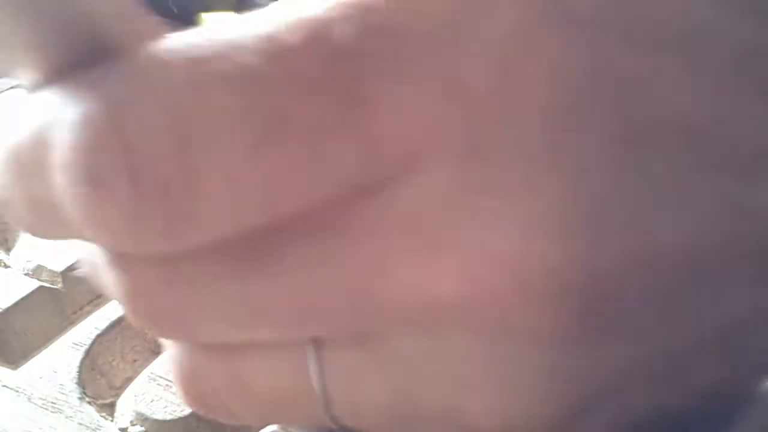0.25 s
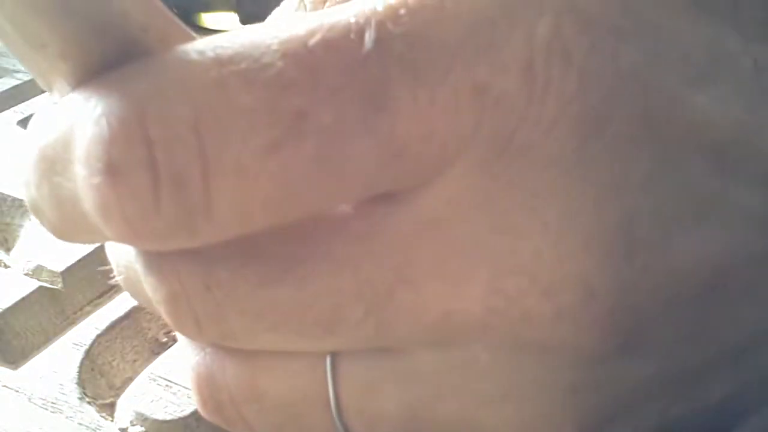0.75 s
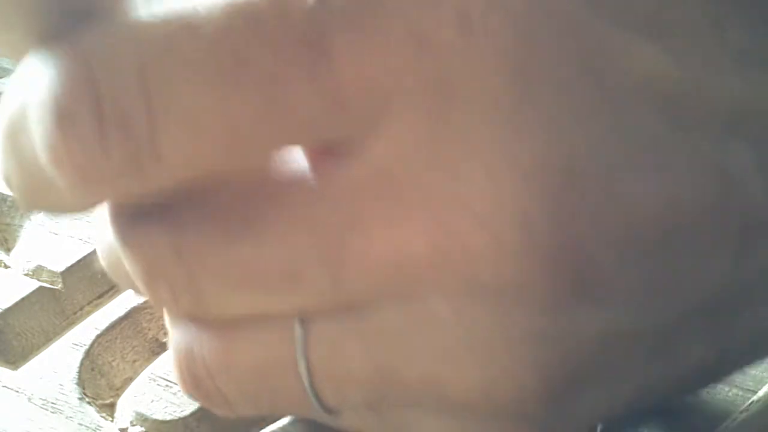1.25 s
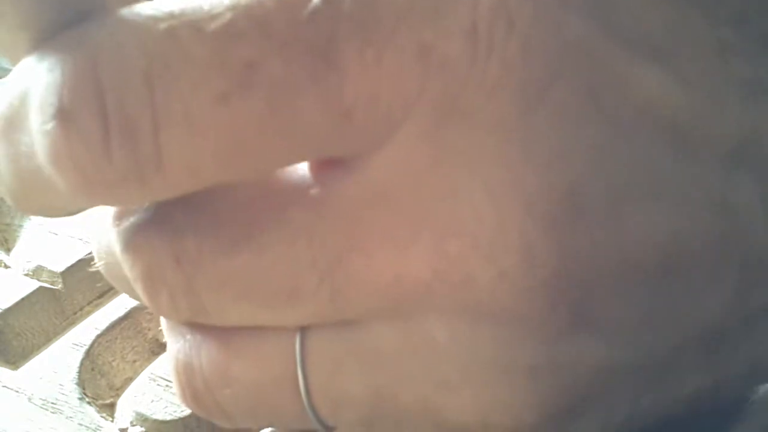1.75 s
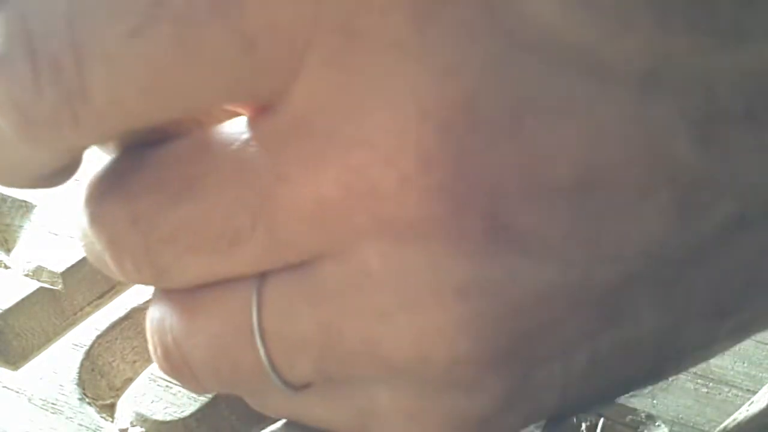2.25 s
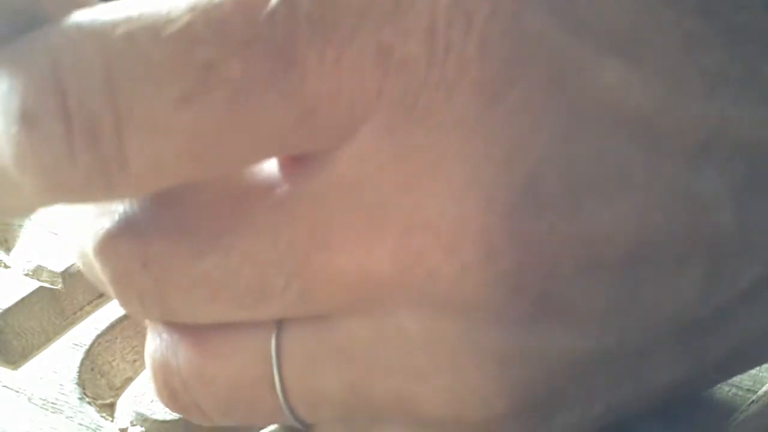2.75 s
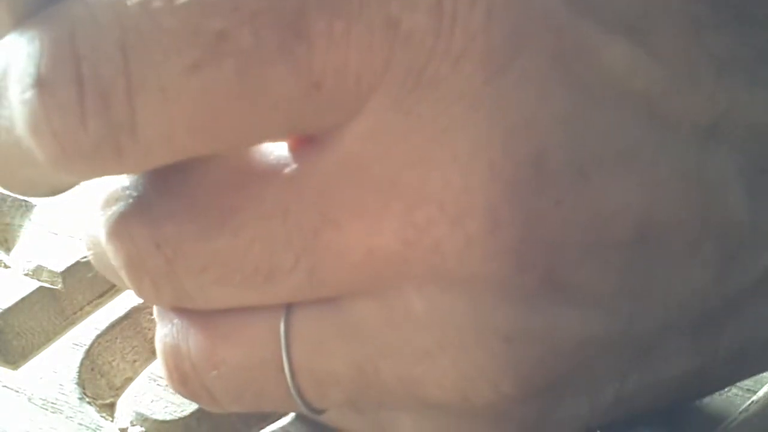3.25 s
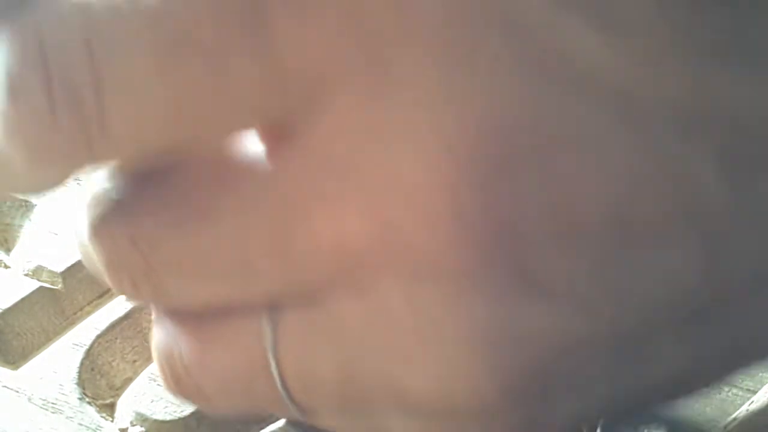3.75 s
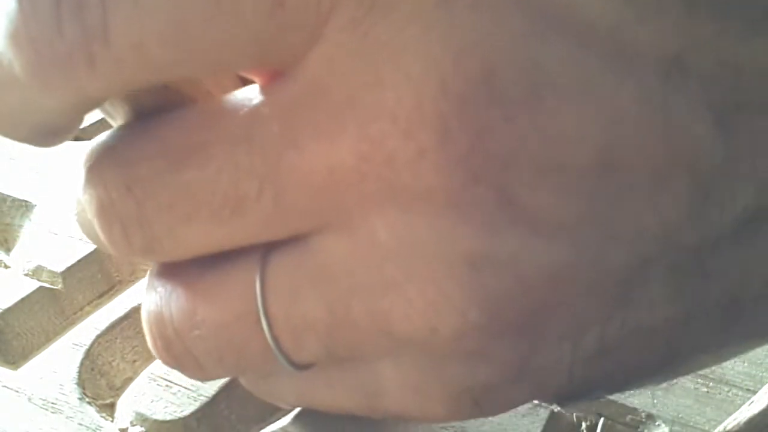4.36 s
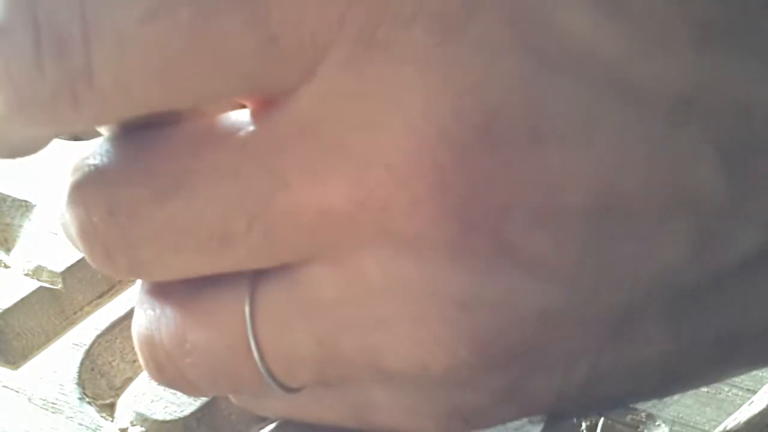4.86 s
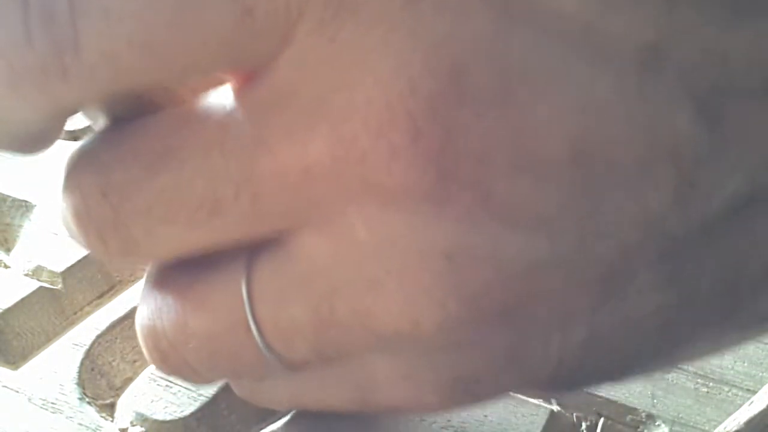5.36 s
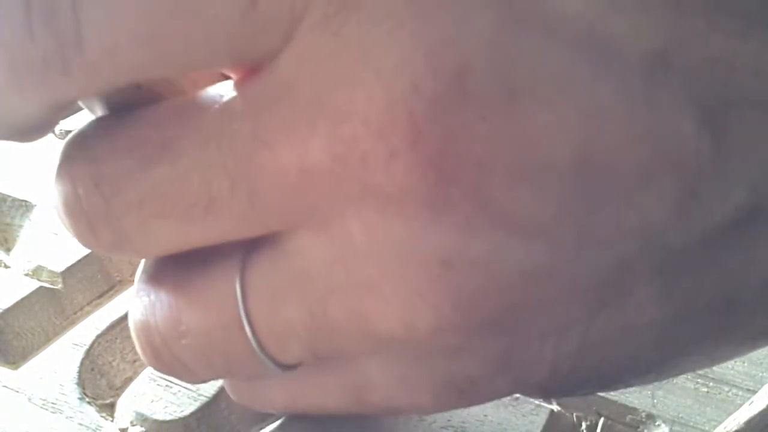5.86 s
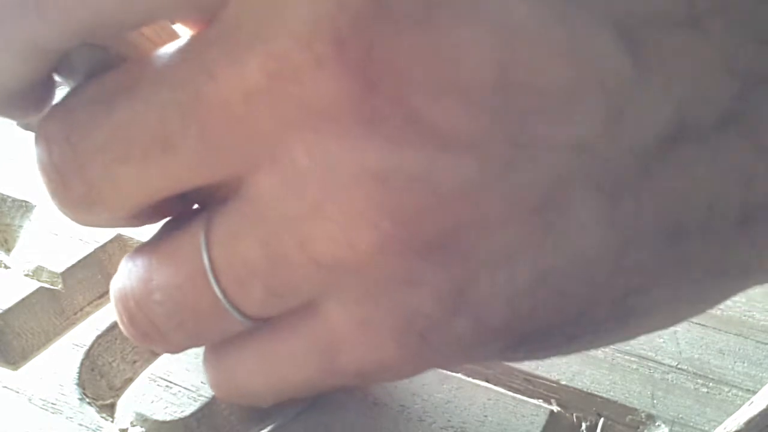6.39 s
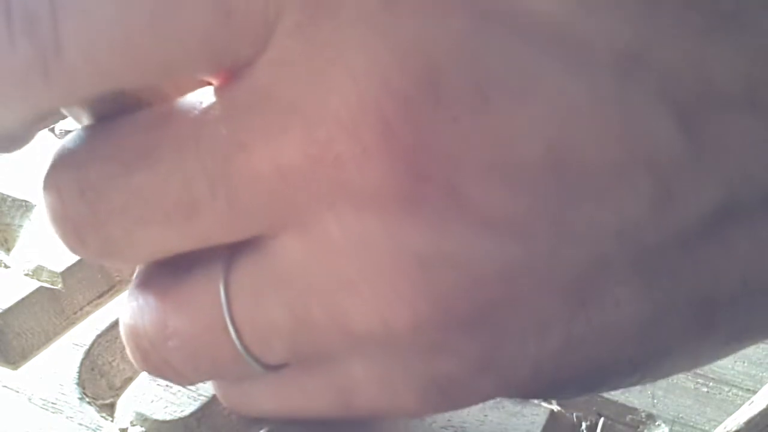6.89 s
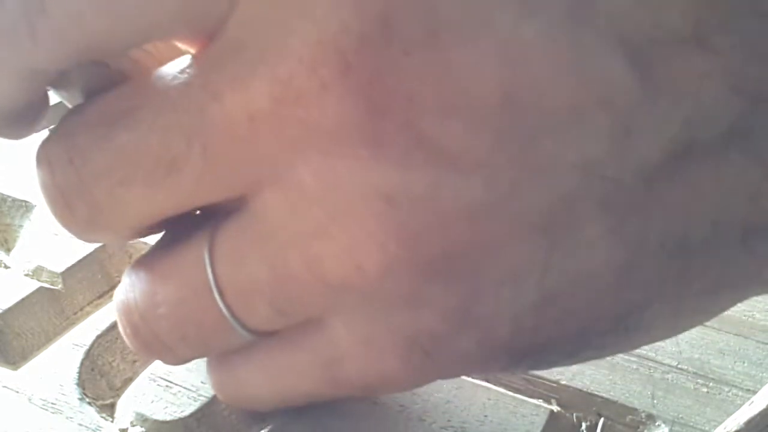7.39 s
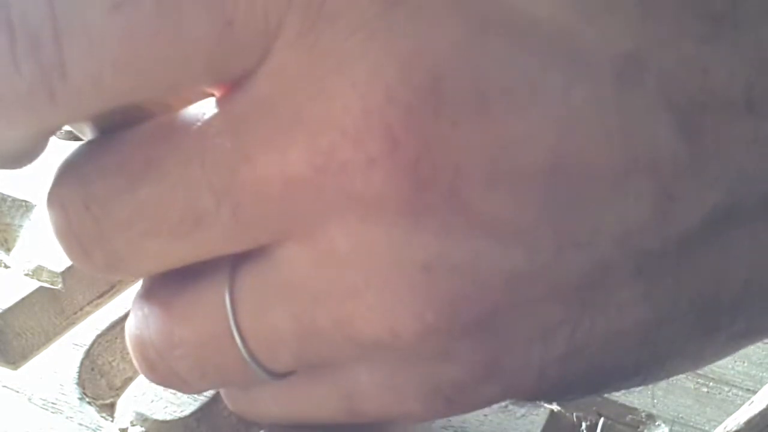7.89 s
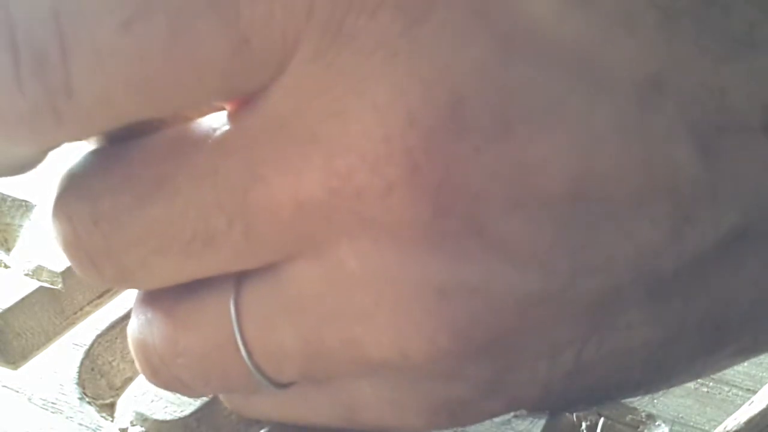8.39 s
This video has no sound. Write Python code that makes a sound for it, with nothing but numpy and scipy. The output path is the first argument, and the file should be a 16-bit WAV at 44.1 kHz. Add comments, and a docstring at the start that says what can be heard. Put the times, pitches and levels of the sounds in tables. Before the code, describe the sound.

Close, soft rasps of a carving tool cutting wood, dotted with crisp little cracks and ticks in a small room.

```python
"""A small gouge works a lettered wooden board, heard close. First a hand wipes the board twice and taps it
near 0.45 s. From 1 s the edge is pushed along the grain in short strokes: the board murmurs, the steel
rasps, chips crack off in clusters of clicks, loudest at 2.5 s. The handle creaks at 3.1 s and the
strokes go on to about 8 s. Throughout, a small room answers over the microphones' own hiss."""
import sys
import numpy as np
from scipy import signal
from scipy.fft import rfft, irfft, next_fast_len
from scipy.io import wavfile
from scipy.ndimage import map_coordinates

SR = 44100
rng = np.random.default_rng(int(sys.argv[2]) if len(sys.argv) > 2 else 0)


def int16_out(signal):
    """Quantize to a 16-bit WAV file."""
    q = np.round(np.clip(np.atleast_2d(signal).T, -1, 1) * 32767)
    wavfile.write(sys.argv[1], SR, q.astype(np.int16))


N = 380583

# modes of board, cutting edge, tool shank, flying splinter: centre_hz, width_hz, gain_db
BOARD_MODES = [(154, 94, -8), (236, 81, -4), (329, 57, -1), (485, 110, -1), (601, 200, -2),
               (803, 120, -4.5), (1262, 400, -9.5)]
EDGE_MODES = [(3520, 360, -7), (4646, 730, 6), (5220, 1080, 5), (5964, 600, 3), (6890, 500, -4.5)]
SHANK_MODES = [(1737, 830, -5), (2230, 170, 3), (2500, 300, -6), (3670, 620, -10)]
SPLINTER_MODES = [(8350, 1600, -2.5), (11350, 740, -4.5), (13620, 1000, -8)]
# stereo likeness of diffuse hiss: freq_hz, correlation
AIR_CORRELATION = [(60, 0.83), (240, 0.24), (950, 0.052), (3750, 0.027), (14900, 0.027)]
# stereo balance of the hand: freq_hz, left_over_right_db
HAND_BALANCE = [(60, 1), (150, -1.5), (380, -4), (950, -1), (2370, 0.5), (5940, -4), (14900, 1)]


def amp(db):
    """dB to gain."""
    return 10 ** (np.asarray(db) / 20)


def unit(x):
    """Scale to rms 1."""
    return x / np.sqrt(np.mean(x ** 2) + 1e-20)


def along(points, hz):
    """Interpolate (freq_hz, value) points on a log axis."""
    freq_hz, values = np.transpose(points)
    return np.interp(np.log(hz + 1), np.log(freq_hz + 1), values)


def wobble(rate_hz):
    """Smooth random curve through rate_hz knots a second."""
    coarse = np.arange(0, N + 16, 16)
    knots = rng.standard_normal(int(N * rate_hz / SR) + 4)
    return np.interp(np.arange(N), coarse, map_coordinates(knots, [coarse * rate_hz / SR]))


def filtered(x, response):
    """Apply a complex frequency response."""
    size = next_fast_len(x.shape[-1] + SR // 2)
    return irfft(rfft(x, size) * response(np.fft.rfftfreq(size, 1 / SR)), size)[..., :x.shape[-1]]


def body(modes):
    """Causal response of resonances (centre_hz, width_hz, gain_db), alternating in sign."""
    return lambda hz: sum((-1) ** k * amp(db) * 1j * hz * width / (centre**2 - hz**2 + 1j * hz * width)
                          for k, (centre, width, db) in enumerate(modes))


def high_pass(corner_hz):
    """Second-order high-pass response."""
    return lambda hz: (1j * hz / (corner_hz + 1j * hz)) ** 2


def brisk_board(hz):
    """Board response to a small quick contact, which hardly moves the lowest modes."""
    return body(BOARD_MODES)(hz) * high_pass(corner_hz=450)(hz)


def peak_one(response):
    """Scale a response so that one blow peaks at 1."""
    peak = np.abs(irfft(response(np.fft.rfftfreq(4096, 1 / SR)))).max()
    return lambda hz: response(hz) / peak


def grit(fine_db, clump_db, shape=()):
    """Friction: noise of uneven grain size, in clumps."""
    size = amp(fine_db * rng.standard_normal(shape + (N,)) + clump_db * wobble(180))
    return unit(size * rng.standard_normal(shape + (N,)))


def contact(start_s, length_s, db, rise_db_s, fall_db_s, change_db=0):
    """Gain of one gesture: rise, hold drifting by change_db, fall."""
    t = np.arange(0, N, 16) / SR - start_s
    held_db = db + change_db * np.clip(t / length_s, 0, 1)
    fade_db = rise_db_s * np.clip(-t, 0, 1) + fall_db_s * np.clip(t - length_s, 0, 1)
    return np.repeat(amp(held_db - fade_db), 16, axis=-1)[..., :N]


def spread(pair, colour, correlation, balance):
    """Mix two unrelated noises to wide stereo of rms 1."""
    angle = lambda hz: np.arccos(np.clip(along(correlation, hz), -1, 1)) / 2
    mid, side = filtered(pair, lambda hz: colour(hz) * [np.cos(angle(hz)), np.sin(angle(hz))])
    stereo = np.array([mid + side, mid - side])
    return unit(filtered(stereo, lambda hz: amp(along(balance, hz) * [[.5], [-.5]])))


def placed(x):
    """Direct sound and its bounce off the board meet differently at the two microphones."""
    # stereo balance at the tool: freq_hz, left_over_right_db
    balance = [(60, -16), (110, -1.5), (200, -8), (380, -0.5), (700, -2.5), (1280, -1), (2370, -1.5),
               (4370, -9.5), (8070, -3), (14900, 2.5)]
    # phase at the right microphone: freq_hz, lag_rad
    right_lag = [(1050, .4), (1720, 3.8), (2070, 4.2), (2750, 6.0), (3450, 7.8), (4130, 11.5), (4820, 12.2),
                 (5500, 12.0), (6900, 11.7), (9000, 13.0)]
    gain = lambda hz: amp(along(balance, hz) * [[.5], [-.5]])
    return filtered(x, lambda hz: gain(hz) * np.exp(-1j * along(right_lag, hz) * [[0], [1]]))


def hiss(level_db=-65):
    """Room air in the bass, microphone hiss above, faintly unsteady."""
    # noise floor: freq_hz, density_db
    spectrum = [(26, -41), (44, -11.5), (53, -22.5), (106, -4.5), (156, -6.5), (199, -2.5), (349, -0.5),
                (882, -6.5), (1270, -7), (1880, -10), (13800, -15), (14900, -28.5)]
    colour = lambda hz: amp(along(spectrum, hz))
    steady = spread(rng.standard_normal((2, N)), colour, AIR_CORRELATION, balance=[(1000, -1.64)])
    return amp(level_db + 0.72 * wobble(1.5)) * steady


def room(x):
    """Small room: a noise tail whose treble dies first."""
    # reverberation: freq_hz, t60_s
    decay = [(300, 0.25), (2000, 0.19), (10000, 0.076)]
    hz, t, noise = signal.stft(rng.standard_normal((2, SR // 3)), SR, nperseg=256)
    tail = signal.istft(noise * amp(-60 * t / along(decay, hz)[:, None]), SR, nperseg=256)[1]
    delayed = np.pad(x, ((0, 0), (120, 0)))
    return signal.fftconvolve(delayed, tail / np.linalg.norm(tail[0]), axes=1)[:, :N]


def bench():
    """The bench shifts under the arm: dull lumps below the board's own notes."""
    # shifts: start_s, held_s, level_db
    shifts = [(2.5, 0.013, -68.5), (3.5, 0.4, -73.5), (4.35, 0.6, -73), (5.29, 0.0068, -65),
              (5.4, 0.38, -83), (6.66, 0.01, -65.5), (7.579, 0.02, -73), (8.2, 0.085, -77)]
    dull = lambda hz: body([(125, 90, 0)])(hz) ** 2
    load = sum(contact(*row, rise_db_s=178, fall_db_s=152.5) for row in shifts)
    return load * amp(0.83 * wobble(14)) * unit(filtered(rng.standard_normal(N), dull))


def squeaks(pitch_hz=4700, width_hz=140):
    """A light drag lets the edge's lowest strong mode sing briefly."""
    # drags: start_s, held_s, level_db
    drags = [(1.607, 0.013, -70), (8.088, 0.012, -71.5)]
    drag = sum(contact(*row, rise_db_s=900, fall_db_s=900) for row in drags)
    return drag * unit(filtered(rng.standard_normal(N), body([(pitch_hz, width_hz, 0)])))


def creak(start_s=3.082, pitch_hz=488, width_hz=18):
    """Weight comes on the handle; slips excite one narrow mode: a first give, then a fainter creak."""
    give = contact(start_s, length_s=0.035, db=-58, rise_db_s=802.5, fall_db_s=400)
    linger = contact(start_s, length_s=0.26, db=-67, rise_db_s=802.5, fall_db_s=400)
    friction = grit(fine_db=2.5, clump_db=4.0)
    return (give + linger) * unit(filtered(friction, body([(pitch_hz, width_hz, 0)])))


def ticks():
    """Dust and splinters: tiny dry ticks in the treble."""
    # ticks: time_s, peak_db
    specks = [(0.0204, -49), (1.3023, -52), (1.3798, -57), (1.9415, -54), (2.583, -48.5), (2.6594, -49.5),
              (3.2221, -54.5), (3.8624, -52), (5.1432, -51), (7.7004, -61), (8.3422, -53.5)]
    blows = np.zeros(N)
    for time_s, peak_db in specks:
        blows[round(time_s * SR)] = amp(peak_db)
    return filtered(blows, peak_one(body(SPLINTER_MODES[:2])))


def hand(wiping_s=1.5):
    """Skin slides over the grain: it drives the board, two small hollows of air and a broad hiss."""
    # contacts of the hand: start_s, held_s, rise_db_s, palm_db, hollow_db, fingertips_db, skin_db
    passes = [(0.075, 0.031, 400, -41, -47, -53, -43.5), (0.14, 0.04, 300, -76, -62, -54.5, -54),
              (0.254, 0.007, 500, -62, -87, -68, -65), (0.335, 0.027, 600, -88, -85, -67, -62),
              (0.416, 0.036, 214, -48, -68, -81, -63), (0.48, 0.0768, 700, -37.5, -46, -44, -43),
              (0.6, 0.057, 298, -57, -51, -52.5, -51), (0.724, 0.068, 300, -49.5, -73, -46.5, -51.5)]
    # fade as the hand lifts: palm_db_s, hollow_db_s, fingertips_db_s, skin_db_s
    lifts = [188, 260, 340, 248]
    # skin hiss: freq_hz, density_db
    skin_spectrum = [(880, -45), (1500, -23.5), (1750, -2), (2480, -3), (3000, -0.5), (4690, 3.5),
                     (9280, -9), (14500, -50.5)]
    # stereo likeness of the hand: freq_hz, correlation
    correlation = [(60, 0.47), (180, 1), (540, 0.98), (1640, -0.37), (4950, 0.11), (14900, -0.32)]
    hollow, fingertips = body([(1290, 260, 0)]), body([(2440, 490, 0)])
    skin = lambda hz: amp(along(skin_spectrum, hz))
    gains = sum(contact(start_s, held_s, np.c_[db], rise_db_s, np.c_[lifts])
                for start_s, held_s, rise_db_s, *db in passes)
    n = round(wiping_s * SR)
    wipe = np.zeros((2, N))
    for gain, colour in zip(gains, (body(BOARD_MODES), hollow, fingertips, skin)):
        friction = grit(fine_db=3.5, clump_db=-0.5, shape=(2,))[:, :n]
        wipe[:, :n] += gain[:n] * spread(friction, colour, correlation, HAND_BALANCE)
    return wipe


def strokes(dull_hz=700):
    """Slow pressure drives the board's low modes; dragging skin adds a faint hiss in step."""
    # the hand leaning into each stroke: start_s, length_s, level_db, change_db
    pushes = [(1.01, 0.75, -75, -8), (2.13, 0.14, -69, 13), (3.1, 0.22, -63.5, -1), (3.42, 0.14, -73.5, 13),
              (3.605, 0.22, -72, 1.5), (4.309, 0.34, -61, -8.5), (4.715, 0.19, -63.5, 0.5),
              (4.903, 0.29, -62, -10.5), (5.236, 0.23, -60, -7), (5.577, 0.018, -59, -8),
              (5.772, 0.26, -63, -8.5), (6.344, 0.14, -62.5, -9.5), (6.632, 0.067, -64.5, -11),
              (7.425, 0.11, -64, -7.5), (7.558, 0.04, -57.5, -13), (7.617, 0.3, -71, -4),
              (8.063, 0.093, -66, -6)]
    push = sum(contact(*row, rise_db_s=450, fall_db_s=405, change_db=change) for *row, change in pushes)
    push *= amp(0.94 * wobble(35))
    drag = spread(rng.standard_normal((2, N)), high_pass(corner_hz=2900), AIR_CORRELATION, HAND_BALANCE)
    dull_board = lambda hz: body(BOARD_MODES)(hz) / (1 + 1j * hz / dull_hz)
    murmur = unit(filtered(grit(fine_db=1.0, clump_db=3.0), dull_board))
    return placed(push * murmur) + amp(-5.5) * push * drag


def slips():
    """The edge slips through fibres: one stream of fine grit shakes edge, shank and board together."""
    # slips: start_s, length_s, edge_db, shank_db, board_db
    rasps = [(1.286, 0.06, -74, -76, -69), (1.595, 0.034, -72, -75, -85), (2.156, 0.054, -64, -63, -57),
             (2.204, 0.026, -59, -59, -63), (2.226, 0.023, -59, -54, -63),
             (2.254, 0.036, -59.5, -55.5, -49), (3.067, 0.041, -75, -77, -62.5),
             (3.139, 0.04, -76, -72, -72), (3.46, 0.049, -61, -63.5, -66), (3.512, 0.017, -61, -61, -67),
             (3.529, 0.019, -54, -52.5, -62), (3.548, 0.0212, -60, -58, -51),
             (3.617, 0.017, -69, -64.5, -64), (3.673, 0.041, -70.5, -73, -67),
             (3.778, 0.029, -65, -68, -68), (4.362, 0.046, -66.5, -69, -67),
             (4.401, 0.037, -63, -63.5, -75), (4.664, 0.071, -67, -72, -60),
             (4.768, 0.063, -67.5, -66.5, -77), (5.324, 0.053, -64.5, -66, -82.5),
             (5.394, 0.045, -61, -59.5, -65), (5.619, 0.084, -71, -68.5, -70.5),
             (5.741, 0.071, -71, -73.5, -63.5), (6.168, 0.043, -75, -70, -67),
             (6.333, 0.053, -65, -65, -57.5), (6.362, 0.13, -69.5, -67.5, -75),
             (6.58, 0.052, -64.5, -73, -78), (7.135, 0.049, -68.5, -71, -81),
             (7.413, 0.0514, -79, -69, -66), (7.526, 0.035, -61.5, -66, -73), (8.06, 0.05, -67, -72, -88)]
    gains = np.zeros((3, N))
    for start_s, length_s, *db in rasps:
        swell = np.sqrt(np.hanning(round(length_s * SR)))
        gains[:, round(start_s * SR):][:, :len(swell)] += amp(np.c_[db]) * swell
    friction = grit(fine_db=0.0, clump_db=1.9)
    edge = lambda hz: body(EDGE_MODES)(hz) + amp(-7) * body(SPLINTER_MODES)(hz)
    parts = edge, body(SHANK_MODES), brisk_board
    return sum(gain * unit(filtered(friction, part)) for gain, part in zip(gains, parts))


def knocks_and_cracks(tail_s=0.0042, splinter_db=-14.5):
    """Sharp blows with a crackling tail: the hand taps the board near 0.45 s; later, chips crack off."""
    # blows: time_s, edge_db, board_re_edge_db, shank_re_edge_db, left_over_right_db, tail_re_blow_db
    blows = [(0.431, -51, 9, -11, 0, -16), (0.4735, -55, 2, -6, -2, -14), (1.5844, -61.5, 11, -8, 0, -12),
             (2.211, -57, -3, -10, 0, -14), (2.223, -54, -15, -12, -2, -11),
             (2.2317, -38.5, -1.5, -18, -1, -10.5), (2.2522, -43.5, 6, -17.5, 0, -18.5),
             (2.263, -45, 12.5, -5, 1, -13), (2.277, -52, 7.5, -5, -3, -17.5),
             (2.4916, -8, -22, -21, 1.5, -15), (2.4977, -23.5, -11.5, -11, 8.5, -5.5),
             (2.5021, -20, -10, -26, -5.5, -13.5), (3.4512, -39, -24, -14.5, 8, -22),
             (3.5354, -65, -5, -18, 3, -14), (3.8005, -44.5, -30, -16, -1, -20),
             (3.8036, -39, -19, -16, 3, -6.5), (3.8114, -38.5, -33, -20, 8, -12.5),
             (4.2536, -57, -17, -14.5, -1, -14), (4.784, -50, -13, -5.5, 0, -8.5),
             (5.5719, -37, -2.5, -2.5, -2.5, -11), (5.6257, -55.5, 7, 4, 8, -13),
             (6.6237, -40, -11.5, -24, -9, -2), (6.6272, -27.5, -15, -20.5, 11, -7),
             (6.633, -33.5, -5.5, -11, -10, -14), (7.4026, -56, 5, -14, -1, -16),
             (7.5542, -40, -9, -19, -12, -8), (7.5573, -32.5, -12, -19, 4, -5.5),
             (7.566, -38, -22, -17, 0, -11)]
    drives = np.zeros((4, 2, N + SR))  # part, channel, sample
    t = np.arange(SR // 20) / SR
    for time_s, edge_db, board_db, shank_db, left_db, tail_db in blows:
        crackle = (2 * rng.random(len(t)) - 1) * (rng.random(len(t)) < .2)  # in a cut: fibres tearing
        blow = amp(tail_db) * crackle * np.exp(-(t / tail_s) ** 4)
        blow[0] = 1
        gains = amp(edge_db + np.array([0, board_db, shank_db, splinter_db]))
        pan = amp(left_db * np.array([[.5], [-.5]]))
        drives[..., round(time_s * SR):][..., :len(t)] += gains[:, None, None] * pan * blow
    parts = body(EDGE_MODES), brisk_board, body(SHANK_MODES), body(SPLINTER_MODES)
    return sum(filtered(drive[:, :N], peak_one(part)) for drive, part in zip(drives, parts))


def scene():
    """Hand and tool in the room."""
    rubbed = strokes() + placed(slips() + squeaks() + creak() + bench())
    struck = placed(knocks_and_cracks() + ticks())
    wipe = hand()
    return rubbed + struck + wipe + room(amp(-6.5) * rubbed + amp(-13.5) * struck + amp(-7.5) * wipe)


def record(dry):
    """The microphones lose the deep bass and add their hiss; nothing passes above top_hz."""
    top_hz = 14920
    return filtered(filtered(dry, high_pass(corner_hz=110)) + hiss(), lambda hz: hz < top_hz)


dry = scene()
out = record(dry)
int16_out(out)
```